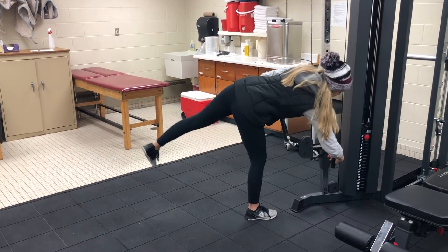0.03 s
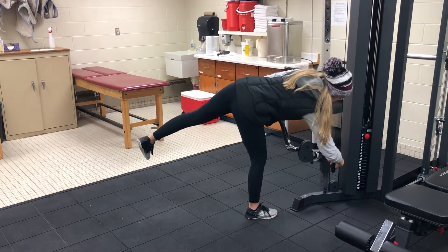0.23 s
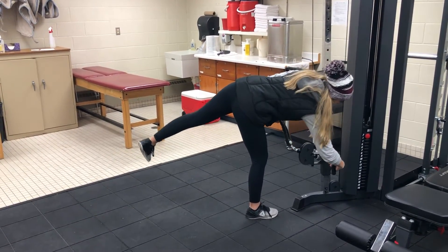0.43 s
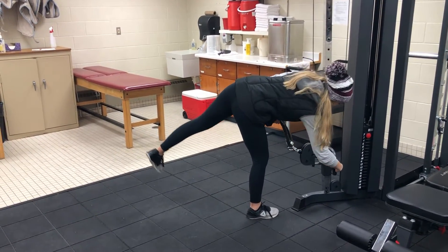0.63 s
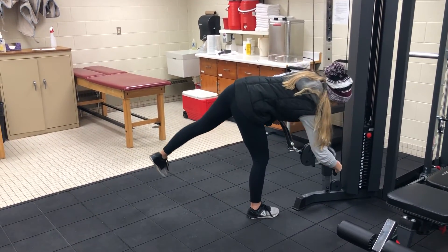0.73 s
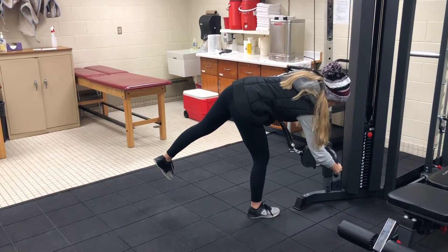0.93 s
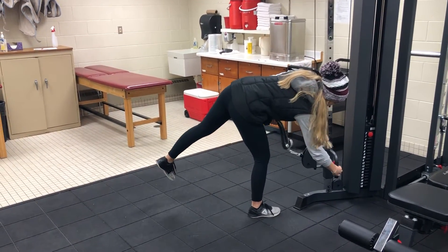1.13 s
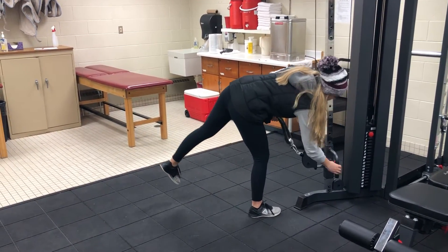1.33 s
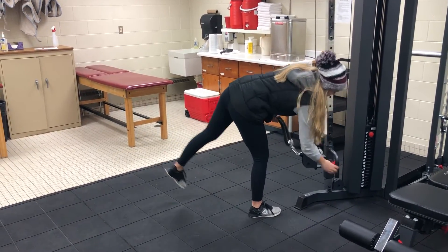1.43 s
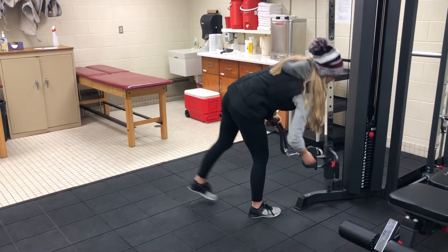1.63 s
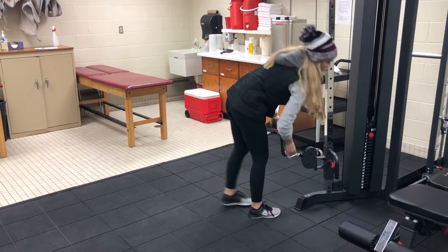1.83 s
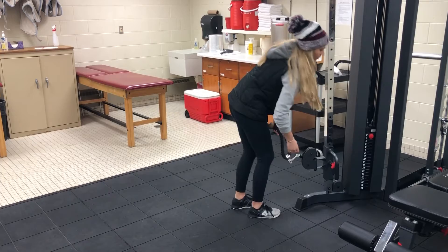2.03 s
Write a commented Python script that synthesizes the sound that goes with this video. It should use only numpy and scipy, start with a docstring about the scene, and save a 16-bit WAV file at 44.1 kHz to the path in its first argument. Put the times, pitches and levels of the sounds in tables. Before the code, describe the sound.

Heavy steel carriage slams onto its stop on a gym cable machine, rattling, then ringing and clinking

```python
"""Carriage crash on a steel column

A pulley carriage slips, scrapes down a steel column and crashes onto its stop in a hard-walled gym room.
Filtered noise makes the scrape, blows and rattle; fading sines make the struck carriage, column, frame,
base, clip, bar and latch ring. A latch knocks earlier, thin squeaks are gliding-level sines, and shaped
noise makes the ventilation rumble and a last faint rustle. Decaying noise bands give the room its tail.
"""
import sys
import numpy as np
from scipy import signal
from scipy.fft import rfft, irfft
from scipy.io import wavfile
from scipy.ndimage import uniform_filter1d

SR = 44100
rng = np.random.default_rng(int(sys.argv[2]) if len(sys.argv) > 2 else 0)


def transcribe(u):
    """Save the signal u as a 16-bit wav file named by the first command-line argument.

    u: samples, shape (n,) or (channels, n), limited to [-1, 1]; the rate is SR.
    q: integer samples, one column per channel.
    """
    v = np.clip(np.atleast_2d(u).T, -1, 1)
    q = np.round(v * 32767).astype(np.int16)
    wavfile.write(sys.argv[1], SR, q)


N = 91242
T = np.arange(N) / SR  # s
CRASH_S = 1.1  # the carriage meets its stop


def amp(db):
    """Level law: 20 dB is a factor of ten in amplitude."""
    return 10 ** (np.asarray(db, float) / 20)


def decay(t, t60):
    """Exponential damping: the amplitude falls by 60 dB in t60 seconds."""
    return np.exp(-np.log(1000) * t / t60)


def ramp(start_s, length_s):
    """Linear growth from 0 at start_s to 1 after length_s, held there."""
    return np.clip((T - start_s) / length_s, 0, 1)


def on_log(points, hz):
    """Interpolation along a logarithmic frequency axis."""
    p = np.array(points, float)
    return np.interp(np.log(hz), np.log(p[:, 0]), p[:, 1])


def conv(a, b):
    """Linear superposition: every sample of a launches a scaled copy of b."""
    return signal.fftconvolve(a, b)[:N]


def split(x, hz, kind):
    """Second-order Butterworth filtering, which selects a part of the spectrum."""
    return signal.sosfilt(signal.butter(2, hz, kind, fs=SR, output="sos"), x)


def colour(x, points):
    """Minimum-phase filtering by a causal response of unit energy with the given (Hz, dB) shape."""
    hz = np.maximum(np.arange(2049) * SR / 4096, 5)
    below_first = np.minimum(np.log10(hz / points[0][0]), 0)
    db = on_log(points, hz) + 40 * below_first  # falls 40 dB per decade below the first point
    cepstrum = irfft(np.log(amp(db)))
    # folding the cepstrum onto positive times makes the filter causal
    cepstrum[1:2048] *= 2
    cepstrum[2049:] = 0
    response = irfft(np.exp(rfft(cepstrum)))
    return conv(x, response / np.sqrt(np.sum(response ** 2)))


def hits(rows):
    """Impulsive excitation: one single-sample force for each (s, dB)."""
    x = np.zeros(N)
    np.add.at(x, [int(row[0] * SR) for row in rows], [amp(row[1]) for row in rows])
    return x


def ring(modes, levels_db):
    """Modal superposition: a struck body answers with a sum of damped sines of alternating sign."""
    out = 0
    for k, ((hz, t60), db) in enumerate(zip(modes, levels_db)):
        out = out + (-1) ** k * amp(db) * np.sin(2 * np.pi * hz * T) * decay(T, t60)
    return out


def burst(length_s):
    """Broadband contact noise under an exponential fade with time constant length_s."""
    return rng.standard_normal(N) * np.exp(-T / length_s)


def room(x, wet_db):
    """Diffuse reverberation: direct sound plus a noise tail with its own decay in each half octave."""
    # Reverberation time. Each row: frequency in Hz, T60 in s.
    room_t60 = [(250, 0.43), (700, 0.38), (1500, 0.39), (2500, 0.34), (4000, 0.34), (7000, 0.24),
                (12000, 0.16)]
    gap_s, build_s = 0.0032, 0.015  # delay and build-up time constant of the tail
    late_db, late_stretch = -24, 2.41  # a weaker, slower tail from the far end of the room
    tail = 0
    for hz in 125 * 2 ** np.arange(0, 7.1, 0.5):
        band = split(rng.standard_normal(N), [hz / 1.19, hz * 1.19], "band")
        t60 = on_log(room_t60, hz)
        fade = decay(T, t60) + amp(late_db) * decay(T, t60 * late_stretch)
        # the divisor offsets the greater energy of a longer tail
        tail = tail + band * fade / np.sqrt(t60 * SR / (2 * np.log(1000)))
    late = np.maximum(T - gap_s, 0)
    return x + amp(wet_db) * conv(x, tail * (1 - np.exp(-late / build_s)))


def bloom(x, start_s, rise_s):
    """Delayed bass radiation: the treble passes at once, the bass swells in from start_s."""
    body_hz = 1000
    low, high = split(x, body_hz, "low"), split(x, body_hz, "high")
    return high - low * ramp(start_s, rise_s) ** 2  # the minus sign matches phases at the crossover


def air():
    """Ventilation as shaped broadband noise, its level flickering slightly."""
    # Rumble spectrum. Each row: frequency in Hz, relative density in dB per Hz.
    air_shape = [(12, -48.5), (20, -4.5), (59, -1.5), (113, -11.5), (215, -13), (247, -14), (292, -11.5),
                 (326, -21), (355, -15), (443, -16), (586, -23.5), (2370, -32), (15800, -48.5)]
    level_db, flicker_db = -58, 0.6  # mean level; spread of the steps before smoothing
    k = SR // 12  # samples per flicker step
    flicker = uniform_filter1d(np.repeat(rng.standard_normal(N // k + 1), k), k)[:N]
    # rotated by half, so the noise is already running at the start
    rumble = np.roll(colour(rng.standard_normal(N), air_shape), N // 2)
    return amp(level_db + flicker_db * flicker) * rumble


def squeaks():
    """Faint pure tones, each a sine under a half-sine envelope."""
    # Each row: start in s, length in s, frequency in Hz, peak level in dB.
    squeak_rows = [(.18, .07, 5280, -80), (.25, .08, 5290, -84), (.2, .09, 3760, -79),
                   (.54, .19, 3580, -80), (1.955, .04, 11700, -80)]
    out = 0
    for start_s, length_s, hz, db in squeak_rows:
        swell = np.sin(np.pi * ramp(start_s, length_s))
        out = out + amp(db) * np.sin(2 * np.pi * hz * T) * swell
    return out


def latch():
    """Impact excitation of latch modes, with contact noise, a brief shudder and the room's answer."""
    # Modes of the latch. Each row: frequency in Hz, T60 in s; then their relative levels in dB.
    latch_modes = [(1260, .08), (1895, .4), (2050, .3), (2099, .35), (2153, .3), (2202, .4), (2444, .15),
                   (2720, .05), (3176, .1)]
    latch_db = [-1.5, -10.5, -13, -3.5, -11, -5.5, -2.5, 1, 1.5]
    # Contact noise spectrum. Each row: frequency in Hz, relative density in dB per Hz.
    knock_shape = [(300, -19), (450, 1.5), (900, -8.5), (1250, -3), (1600, -8.5), (2150, -4), (3000, -7.5),
                   (4000, -11.5), (6000, -11), (9000, -21.5), (13000, -39)]
    knock_s, ring_db, crack_db = 0.3263, -50.5, -43
    shudder_db, shudder_s = -13, 0.058  # relative to the crack; fade time constant
    tones = conv(hits([(knock_s, ring_db)]), ring(latch_modes, latch_db))
    crack = burst(0.0028) + amp(shudder_db) * burst(shudder_s)
    noise = colour(conv(hits([(knock_s, crack_db)]), crack), knock_shape)
    return bloom(room(tones + noise, 2.5), knock_s, 0.02)


def rattle():
    """Random impacts: a dense train of ticks of loose parts, holding steady and then fading."""
    level_db, hold_s, fade_s = -20.5, 0.056, 0.015
    per_s, scatter_db = 1300, 1  # mean tick rate; mean of the exponential level scatter
    size = amp(scatter_db * rng.exponential(size=N)) * rng.choice([-1, 1], N)
    ticks = size * (rng.random(N) < per_s / SR)
    since = T - CRASH_S
    shake = (since > 0) * np.exp(-np.maximum(since - hold_s, 0) / fade_s)
    return amp(level_db) * shake * ticks / ticks.std()


def carriage():
    """Friction noise up to the crash, then impact noise; the blows and rattle also excite modes."""
    # Blows of the carriage. Each row: time in s, drive level in dB.
    blows = [(1.073, -41), (1.101, -14.5), (1.105, -17.5), (1.111, -12), (1.14, -21.5), (1.155, -14.5),
             (1.168, -17), (1.185, -19.5)]
    # Scrape and crash spectra. Each row: frequency in Hz, relative density in dB per Hz.
    scrape_shape = [(350, -63.5), (600, -37.5), (1130, -3.5), (2030, -6), (2230, -15.5), (2460, -13.5),
                    (5070, -26.5), (9920, -31.5), (15800, -17)]
    crash_shape = [(150, -33), (300, -24), (500, -14.5), (700, -11), (1000, -8.5), (1500, -3.5), (2000, -2),
                   (2500, -0.5), (3200, -5), (4200, -10), (6500, -5), (10000, -10), (15800, -13)]
    # Short modes. Each row: frequency in Hz, T60 in s; then their relative levels in dB.
    carriage_modes = [(1500, .08), (1980, .08), (2026, .1), (2222, .1), (2375, .1), (2500, .08),
                      (2612, .08), (6420, .05), (8265, .05), (9597, .06)]
    carriage_db = [-37.5, -34.5, -45, -45, -38, -47, -43, -53, -40.5, -31]
    slip_s, scrape_rise_s, scrape_db = 1.053, 0.024, -42.5
    slide = amp(scrape_db) * ramp(slip_s, scrape_rise_s) * rng.standard_normal(N)
    force = rattle() + conv(hits(blows), burst(0.0045))
    scrape = colour((slide + force) * (T < CRASH_S), scrape_shape)
    crash = colour(force * (T > CRASH_S), crash_shape)
    tones = conv(force, ring(carriage_modes, carriage_db))
    return bloom(room(scrape + crash + tones, 5), CRASH_S, 0.035)


def clip():
    """Impact excitation of a small steel clip: high modes and a noise click at each clink."""
    # Each row: time in s, drive level of the ring in dB, drive level of the click in dB.
    clinks = [(1.054, -51, -64), (1.073, -55, -46.5), (1.542, -45, -38), (1.558, -45, -78),
              (1.575, -42, -76), (1.597, -32, -28.5), (1.623, -38, -39), (1.634, -54, -44)]
    clip_modes = [(6298, .1), (6400, .13), (6600, .06), (8387, .05), (9098, .05), (9781, .05), (9911, .08),
                  (11770, .04), (12600, .11), (12640, .09), (13500, .04), (15140, .07), (15650, .04)]
    clip_db = [-15.5, -6.5, -13, -22.5, -22, -16, -18.5, -9, -2, -0.5, -13.5, -28, -8]
    # Click spectrum. Each row: frequency in Hz, relative level in dB.
    click_shape = [(2500, -22), (5000, -22), (6200, -2), (10000, -5), (13000, -2), (15500, 0)]
    tones = conv(hits(clinks), ring(clip_modes, clip_db))
    click_force = hits([(s, click_db) for s, _, click_db in clinks])
    return tones + colour(conv(click_force, burst(0.0012)), click_shape)


def frame():
    """Long modes of column and frame build up after the crash, then decay, wavering in level and phase."""
    # Mode frequencies in Hz.
    frame_hz = [168, 204, 214.5, 217.5, 240, 268, 282, 404, 446, 453, 496, 576, 711, 810, 996, 1240, 1290,
                1326, 1355, 1400, 1864, 1874, 2046, 2420]
    # Each row: level in dB, T60 in s, build-up time constant in s, unsteadiness from 0 to 1.
    frame_rows = [(-43, 1, 0.032, 0.1), (-44.5, 4., 0.023, 0.7), (-41.5, 6.4, 0.017, 0.7),
                  (-44, 5.8, 0.021, 0), (-36.5, 4.6, 0.17, 0), (-40, 1.3, 0.031, 0.2),
                  (-35.5, 1.4, 0.074, 0.7), (-35, 1.1, .03, 0.8), (-32.5, 1, .03, 0),
                  (-43.5, 0.86, 0.09, .1), (-33, 0.75, .03, 0), (-44.5, 1.78, .03, 0.7),
                  (-43.5, 1.6, 0.036, 1), (-45, 1.2, .03, 1), (-40, 1., 0.027, 0.8), (-44.5, 2.3, .02, 0.6),
                  (-35, 1.21, 0.0067, 0), (-39, 1.8, .02, 0.5), (-37.5, 1.7, 0.017, 1),
                  (-42.5, 0.75, .02, .7), (-41.5, 2.1, 0.016, .1), (-32.5, 1.4, .02, 0.3),
                  (-24.5, 0.58, 0.029, .6), (-45.5, .8, .02, .9)]
    waver_hz = 25  # fastest wavering
    t = np.maximum(T - CRASH_S, 0)
    out = 0
    for hz, (db, t60, rise_s, rough) in zip(frame_hz, frame_rows):
        waver = split(rng.standard_normal(N) + 1j * rng.standard_normal(N), waver_hz, "low")
        # steady and wavering parts share a constant mean power
        phasor = np.sqrt(1 - rough ** 2) + rough * waver / waver.std()
        tone = np.imag(phasor * np.exp(2j * np.pi * hz * t))
        out = out + amp(db) * tone * (1 - np.exp(-t / rise_s)) ** 2 * decay(t, t60)
    return out


def base():
    """Delayed modal response: a dull thud through the foot as the base takes the load a moment later."""
    # Modes of the base. Each row: frequency in Hz, T60 in s; then their levels in dB.
    base_modes = [(455, .3), (495, .4), (220, .3), (330, .25), (540, .2), (430, .2), (985, .25),
                  (1120, .25)]
    base_db = [-18, -26, -29, -36, -31, -28, -27, -28]
    thud_s, rise_s = 1.122, 0.025
    return conv(hits([(thud_s, 0)]), ring(base_modes, base_db)) * ramp(thud_s, rise_s)


def taps():
    """Light impacts on a bar: each tap excites its modes and a short contact noise."""
    # Each row: time in s, drive level in dB.
    tap_rows = [(1.5, -69), (1.52, -53), (1.598, -45.5), (1.78, -68)]
    # Modes of the bar. Each row: frequency in Hz, T60 in s; then their relative levels in dB.
    bar_modes = [(1712, .3), (1530, .12), (1765, .12)]
    bar_db = [-5, -7, -20]
    # Contact noise spectrum. Each row: frequency in Hz, relative level in dB.
    tap_shape = [(1000, -8), (2500, -2), (4500, 0), (6500, -10), (10000, -30)]
    return conv(hits(tap_rows), ring(bar_modes, bar_db) + colour(burst(0.0059), tap_shape))


def rustle():
    """Shaped broadband noise: a faint rustle rising at the end."""
    # Spectrum. Each row: frequency in Hz, relative level in dB.
    rustle_shape = [(500, 7.5), (2000, 5.5), (4000, -4), (8000, -21), (15000, -14)]
    start_s, rise_s, level_db = 1.935, 0.08, -62
    return amp(level_db) * ramp(start_s, rise_s) * colour(rng.standard_normal(N), rustle_shape)


def scene():
    """Superposition of all sources; the small parts share one room response."""
    small_parts = room(squeaks() + clip() + taps(), 3)
    machine = latch() + carriage() + frame() + base()
    return (air() + small_parts + machine + rustle())[None, :]


def record(dry):
    """Band limiting and saturation: the phone drops the deepest bass, rounds peaks and cuts the top."""
    low_hz, top_hz, ceiling = 37, 15850, 1  # ceiling in full-scale units
    x = signal.sosfilt(signal.butter(4, low_hz, "high", fs=SR, output="sos"), dry)
    rounded = ceiling * np.tanh(x / ceiling)
    return signal.sosfilt(signal.ellip(12, 0.2, 100, top_hz, fs=SR, output="sos"), rounded)


dry = scene()
out = record(dry)
transcribe(out)
```